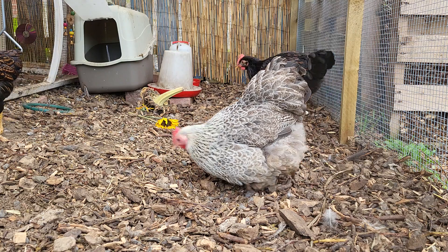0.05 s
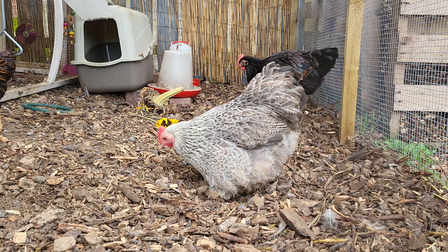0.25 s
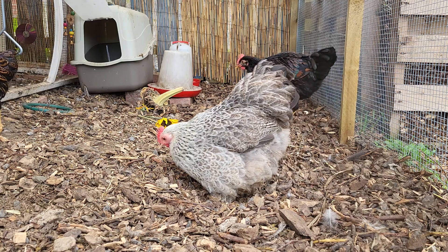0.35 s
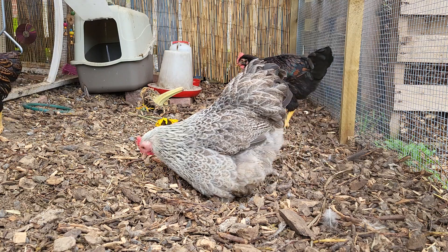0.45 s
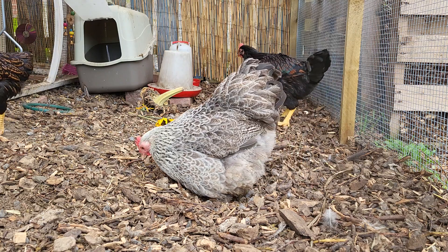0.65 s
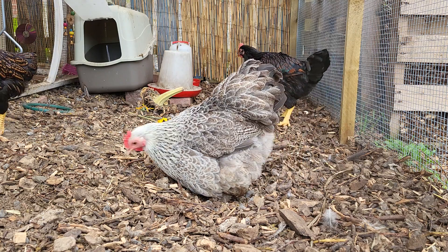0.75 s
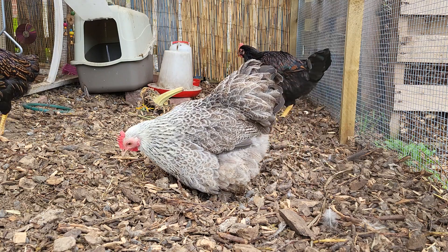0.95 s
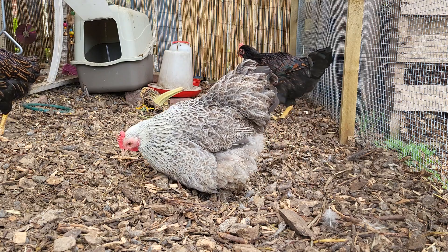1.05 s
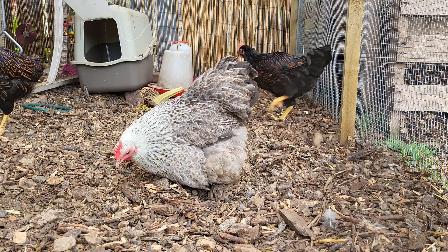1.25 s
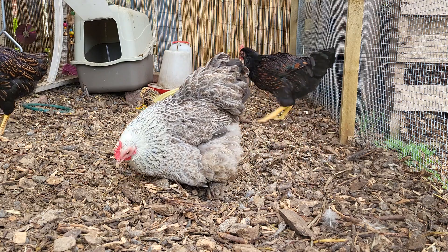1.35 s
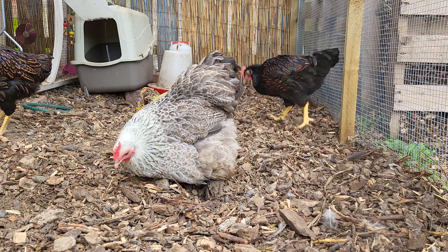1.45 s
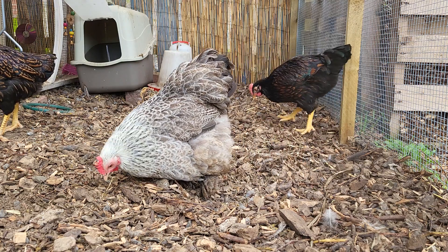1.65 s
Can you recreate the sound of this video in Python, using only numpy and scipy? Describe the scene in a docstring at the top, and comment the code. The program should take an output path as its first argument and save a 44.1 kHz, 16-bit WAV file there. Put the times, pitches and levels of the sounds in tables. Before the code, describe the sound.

Dry wood-chip scratching by a hen: one strong scrape with thumps, then a fainter one

```python
"""Hens shift about on dry wood chips in a coop: two soft rustles, each with a sharp scratch in it.
Scratches are runs of tiny clicks that ring the wood, with a hollow body; rustles are crackle and hiss.
The first scratch is the stronger; dull thumps, short low tones, follow it, and a faint one the second.
Two short rings are noise through narrow filters. The enclosure rings on, longest in the bass.
Underneath lie a steady mains hum made of sine tones, and a low rumble and faint air made of noise."""
import sys
import numpy as np
from scipy import signal
from scipy.fft import rfft, irfft
from scipy.io import wavfile

SR = 44100
rng = np.random.default_rng(int(sys.argv[2]) if len(sys.argv) > 2 else 0)


def output_pcm(signal):
    """Save a mono or channel-first signal as 16-bit PCM at the path in sys.argv[1].

    Samples are clipped to [-1, 1] before scaling.
    """
    pcm = np.clip(np.atleast_2d(signal).T, -1, 1) * 32767
    wavfile.write(sys.argv[1], SR, np.round(pcm).astype(np.int16))


N = 74970  # length in samples, 1.7 s
RUSTLE_WET_DB = -8  # room tail added to the rustles and the rings


def undb(db):
    """Turn decibels into a gain."""
    return 10 ** (np.asarray(db) / 20)


def unit(x):
    """Scale to an average strength (rms) of 1."""
    return x / np.sqrt(np.mean(x ** 2) + 1e-20)


def over_hz(points, hz):
    """Read a curve of (Hz, value) points, with straight lines on a log-frequency axis."""
    p = np.array(points)
    return np.interp(np.log(hz + 1e-3), np.log(p[:, 0]), p[:, 1])


def bins():
    """Frequencies in Hz of the full-length spectrum."""
    return np.fft.rfftfreq(N, 1 / SR)


def colour(x, points):
    """Filter x by a curve of (Hz, dB) points, then scale it to rms 1."""
    return unit(irfft(rfft(x) * undb(over_hz(points, bins())), N))


def swell(start, rise, fade):
    """Loudness shape: a straight rise, then an exponential fade of 60 dB in fade seconds."""
    age = np.arange(N) / SR - start
    return np.clip(age / rise, 0, 1) * undb(-60 * np.maximum(age - rise, 0) / fade)


def grains(rate, spread_db):
    """Dense tiny clicks of uneven size and random sign, about rate of them per second."""
    hit = rng.random(N) < rate / SR
    size = undb(spread_db * np.minimum(rng.exponential(size=N), 4))
    return unit(hit * size * np.sign(rng.standard_normal(N)))


def pan(db):
    """Left and right gains for a left-minus-right level in dB."""
    return undb(np.array([[db], [-db]]) / 2)


def scratches(walls):
    """Claws drag through the chips: a run of clicks rings the wood, and a hollow body follows."""
    # Each row: start in seconds, rise in seconds, time to fade by 60 dB in seconds,
    # level in dB, hollow body level in dB relative to the scratch.
    strokes = [(.302, .001, 0.123, -30, -33), (.310, .008, 0.1244, -20.5, -12),
               (.328, .002, 0.12, -17.5, -16.5), (0.547, 0.013, 0.053, -43, -11),
               (1.389, 0.0076, .13, -29.5, -15)]
    # Tone of the bare scrape. Each row: frequency in Hz, strength in dB per Hz.
    scrape_colour = [(300, -28), (900, -15), (1300, -11), (1600, -3.5), (2050, 0.5), (2900, -2), (4600, -8),
                     (7600, -10), (8600, -24.5), (15500, -21.5)]
    # Pitches at which the chips ring. Each row: frequency in Hz, width in Hz, level in dB.
    chip_modes = [(1800, 340, -2), (1995, 180, -1.5)]
    # Tone of the hollow body. Each row: frequency in Hz, strength in dB per Hz.
    body_colour = [(120, -17), (260, -5.5), (400, 1.5), (620, 0), (800, -7.5), (1200, -7.5), (3000, -30.5)]
    grains_per_s, spread_db, chip_ring_db = 6000, 2, -8.5
    body_lag_s, body_rise_s, body_fade_s = 0.0015, .019, .3
    scrape_wet_db, body_wet_db = -5, -1.5  # tail relative to the near sound
    pan_db, right_lead_s = -2.5, .00047  # louder on the right, and sooner there

    clicks = grains(grains_per_s, spread_db)
    force = sum(undb(db) * swell(s, rise, fade) for s, rise, fade, db, _ in strokes)
    modes = sum(undb(db) / (1 + 2j * (bins() - hz) / width) for hz, width, db in chip_modes)
    ring = unit(irfft(rfft(clicks) * modes, N))
    scrape = force * unit(colour(clicks, scrape_colour) + undb(chip_ring_db) * ring)

    push = sum(undb(db + body) * swell(s + body_lag_s, body_rise_s, body_fade_s)
               for s, _, _, db, body in strokes)
    hollow = push * colour(rng.standard_normal(N), body_colour)
    placed_scrape = place(scrape, walls, scrape_wet_db, pan_db, right_lead_s)
    return placed_scrape + place(hollow, walls, body_wet_db)


def rustles(walls):
    """Feathers and dry litter brush together: fine crackle with a thin hiss on top."""
    # Each row: start in seconds, rise in seconds, time to fade by 60 dB in seconds,
    # level in dB, fine hiss level in dB relative to the crackle.
    brushes = [(0.119, 0.036, 3, -62, -3.5), (.159, .005, 0.7, -53, -7.5),
               (0.193, 0.0095, 0.3, -40.5, -6.5), (.211, 0.022, 0.29, -43.5, -3),
               (.301, .002, 0.1266, -33.5, -5.5), (.34, 0.024, 0.0845, -35.5, -9),
               (.426, 0.018, 0.1537, -44.5, -6), (.511, 0.013, 0.1565, -49, 2.5),
               (0.542, 0.015, 0.16, -44, -12), (.628, 0.026, .09, -59.5, -15),
               (.697, 0.0068, .13, -58.5, -12), (1.085, 0.058, 0.4, -65.5, -4),
               (1.138, .003, 0.33, -55, -8.5), (1.156, 0.026, 0.41, -45, -2), (1.206, 0.022, 0.3, -44.5, 0),
               (1.27, 0.056, 1, -52, -5.5), (1.394, 0.0099, 0.12, -39.5, -5.5),
               (1.465, 0.027, 0.37, -52, -1), (1.578, 0.014, 0.2, -58, -5),
               (1.627, 0.0092, 0.1, -45.5, -10), (1.665, .012, .2, -59, -8)]
    # Tone of the hiss. Each row: frequency in Hz, strength in dB per Hz.
    hiss_colour = [(3000, -40), (7000, -14), (8800, -3), (12000, 0), (15500, -0.5)]
    crackle_pan_db, hiss_pan_db = -2, -6  # left minus right

    # Overlapping brushes add as power, hence the squares and the root.
    rub = np.sqrt(sum((undb(db) * swell(s, rise, fade)) ** 2
                      for s, rise, fade, db, _ in brushes))
    fine = np.sqrt(sum((undb(db + rel_db) * swell(s, rise, fade)) ** 2
                       for s, rise, fade, db, rel_db in brushes))
    crackle = rub * litter() * pan(crackle_pan_db)
    hiss = fine * colour(rng.standard_normal((2, N)), hiss_colour) * pan(hiss_pan_db)
    close = crackle + hiss
    _, tail = walls
    return close + undb(RUSTLE_WET_DB) * signal.fftconvolve(close, tail, axes=1)[:, :N]


def litter():
    """Stereo crackle from chips spread over the ground: part shared, part separate on each side."""
    # Tone of the crackle. Each row: frequency in Hz, strength in dB per Hz.
    crackle_colour = [(300, -24), (700, -18), (1200, -9.5), (1800, -11), (3000, -4.5), (5000, -1),
                      (7700, 0.5), (8600, -15), (15500, -23.5)]
    grains_per_s, spread_db = 4000, 3.5
    share = 0.87  # part of the power that each side hears on its own
    common, left, right = (grains(grains_per_s, spread_db) for _ in range(3))
    both = np.sqrt(1 - share) * common + np.sqrt(share) * np.array([left, right])
    return colour(both, crackle_colour)


def rings(walls):
    """Pieces ring when rubbed, as narrow noise: a thin squeak before the first scratch, a low note after."""
    # Each row: start in seconds, pitch in Hz, width in Hz, level in dB,
    # time to fade by 60 dB in seconds.
    pieces = [(.273, 5796, 600, -41, 0.04), (0.534, 611, 11, -50, .16)]
    rise_s = 0.011
    out = 0
    for s, hz, width, db, fade in pieces:
        resonance = 1 / (1 + 2j * (bins() - hz) / width) ** 2
        tone = irfft(rfft(rng.standard_normal(N)) * resonance, N)
        out = out + undb(db) * swell(s, rise_s, fade) * unit(tone)
    return place(out, walls, RUSTLE_WET_DB)


def thumps(walls):
    """Soft blows on the ground: each is a low sine tone that swells up and dies away quickly."""
    # Each row: start in seconds, pitch in Hz, level in dB.
    blows = [(.352, 145, -32), (0.388, 73.5, -27.5), (0.417, 122.6, -32), (.455, 132.2, -27.5),
             (0.538, 95, -32.5), (0.62, 70, -42), (1.41, 148, -45.5)]
    rise_s, fade_s, wet_db = .011, 0.1257, -14
    t = np.arange(N) / SR
    x = sum(undb(db) * swell(s, rise_s, fade_s) * np.sin(2 * np.pi * hz * (t - s))
            for s, hz, db in blows)
    return place(x, walls, wet_db)


def diffuse():
    """Left and right noise, much alike in the bass and slightly opposed in the treble."""
    # Likeness of the two sides. Each row: frequency in Hz, left-right correlation from -1 to 1.
    likeness = [(25, .55), (60, .72), (150, 0.81), (450, 0.32), (1800, 0.23), (4000, -.1), (15000, -0.25)]
    alike = np.clip(over_hz(likeness, bins()), -.98, .98)
    mid, side = rfft(rng.standard_normal((2, N)))
    mid, side = mid * np.sqrt(1 + alike), side * np.sqrt(1 - alike)
    return unit(irfft(np.array([mid + side, mid - side]), N))


def room():
    """Response of the enclosure: early reflections, and a tail whose bands each decay at their own pace."""
    # How long the tail lasts. Each row: frequency in Hz, time to fade by 60 dB in seconds.
    tail_fade = [(80, 1.2), (200, 1.0), (480, .9), (820, .62), (2000, .41), (5000, .3), (14000, .22)]
    build_s = .012
    near_fade_s = .05  # early reflections from the ground and nearby boards
    noise, tail = rfft(diffuse()), 0
    for hz in 25 * 2 ** (np.arange(20) / 2):  # half-octave steps
        band = np.maximum(1 - 2 * abs(np.log2((bins() + 1) / hz)), 0)
        fade = swell(0, build_s, over_hz(tail_fade, hz))
        tail = tail + irfft(noise * band, N) * fade / np.sqrt(np.sum(fade ** 2))
    above_bass = signal.butter(2, 400, "high", fs=SR, output="sos")
    early = signal.sosfilt(above_bass, diffuse()) * swell(0, .001, near_fade_s)
    return unit(early) / np.sqrt(N), tail


def place(x, walls, wet_db, pan_db=0, lead_s=0):
    """A sound with its reflections; its direct part reaches the right side lead_s sooner."""
    near_db = 2.5  # early reflections relative to the direct sound
    early, tail = walls
    direct = np.array([np.roll(x, int(lead_s * SR)), x])
    near, far = (signal.fftconvolve(x[None], h, axes=1)[:, :N] for h in (early, tail))
    # Dividing by hypot makes up for the power that the reflections add.
    close = (direct + undb(near_db) * near) / np.hypot(1, undb(near_db))
    return (close + undb(wet_db) * far) / np.hypot(1, undb(wet_db)) * pan(pan_db)


def background():
    """Mains hum of sine tones, an uneven low rumble that swells after the first scratch, and faint air."""
    # Tones of the hum. Each row: frequency in Hz, level in dB.
    hum_lines = [(100.2, -44), (200.4, -62), (300.6, -74.5), (400.8, -74)]
    # Tone of the rumble. Each row: frequency in Hz, strength in dB per Hz.
    rumble_colour = [(20, -17), (40, -10), (60, -0.5), (85, -5.5), (130, -12), (220, -25), (500, -50),
                     (2000, -100)]
    # Loudness of the rumble. Each row: time in seconds, level in dB.
    rumble_level = [(0, -62.5), (.3, -52.5), (.42, -41), (.65, -45.5), (.9, -49), (1.2, -52), (1.7, -53.5)]
    # Tone of the air. Each row: frequency in Hz, strength in dB per Hz.
    air_colour = [(100, 0), (250, 0), (450, -6.5), (720, -12), (1000, -8.5), (1500, -21.5), (2500, -29),
                  (5500, -29.5), (7200, -25.5), (8600, -32), (15500, -31)]
    hum_waver_db, rumble_flutter_db, air_db = 1.2, 1.5, -62

    t = np.arange(N) / SR
    slow = [(12, 0), (30, -60), (100, -120)]  # Hz, dB: keeps only slow changes
    waver, flutter = (colour(rng.standard_normal(N), slow) for _ in range(2))
    hum = sum(np.sqrt(2) * undb(db) * np.sin(2 * np.pi * (hz * t + rng.random()))
              for hz, db in hum_lines)
    level_db = np.interp(t, *np.array(rumble_level).T) + rumble_flutter_db * flutter
    rumble = undb(level_db) * colour(diffuse(), rumble_colour)
    air = undb(air_db) * colour(diffuse(), air_colour)
    return hum * undb(hum_waver_db * waver) + rumble + air


def scene():
    """All sources together; the scratches, rustles, rings and thumps share one enclosure."""
    walls = room()
    return scratches(walls) + rustles(walls) + rings(walls) + thumps(walls) + background()


def record(dry):
    """The recorder cuts the top: a steep low-pass filter."""
    top_hz = 15900
    return signal.sosfilt(signal.ellip(10, .2, 80, top_hz, fs=SR, output="sos"), dry)


dry = scene()
out = record(dry)
output_pcm(out)
```